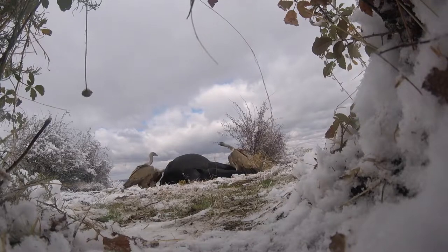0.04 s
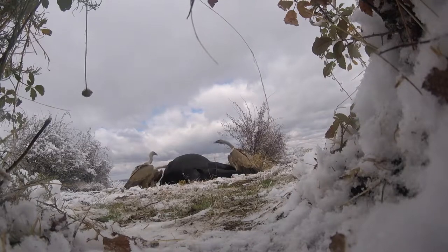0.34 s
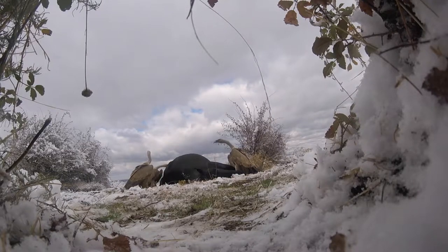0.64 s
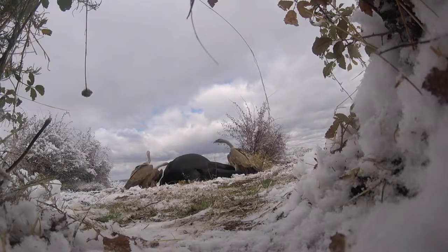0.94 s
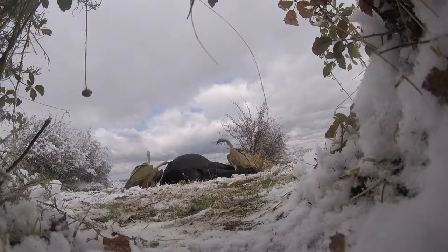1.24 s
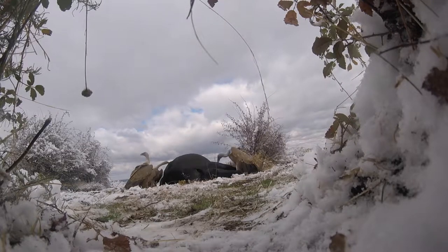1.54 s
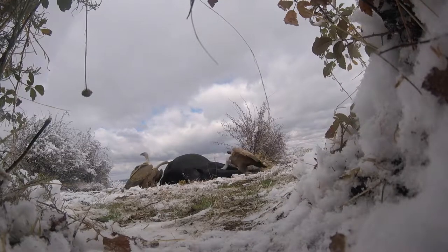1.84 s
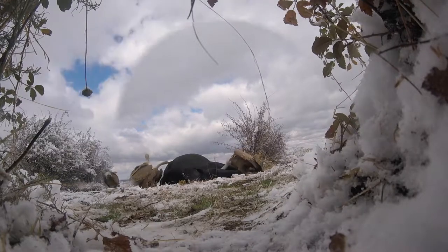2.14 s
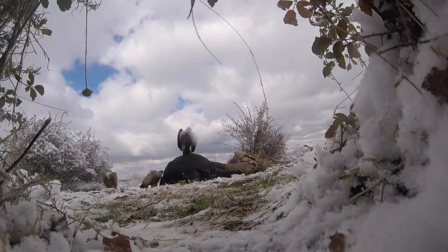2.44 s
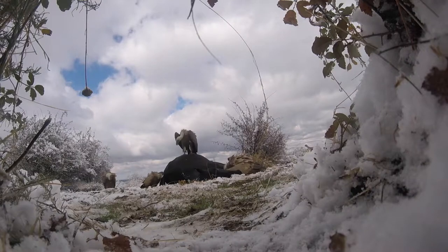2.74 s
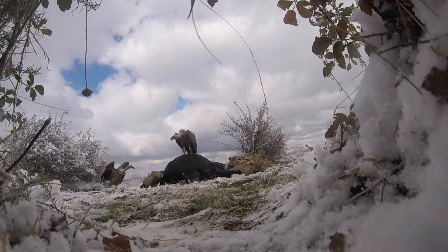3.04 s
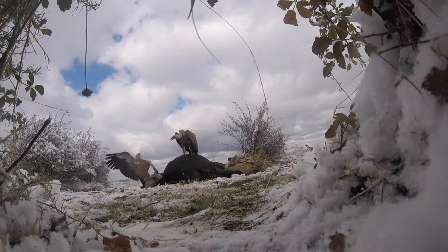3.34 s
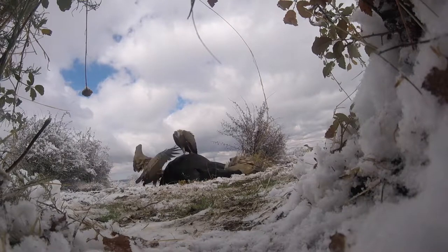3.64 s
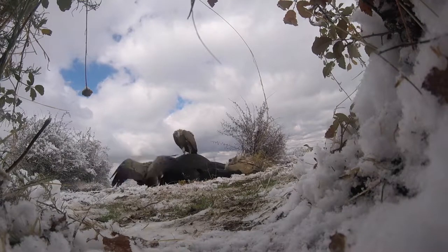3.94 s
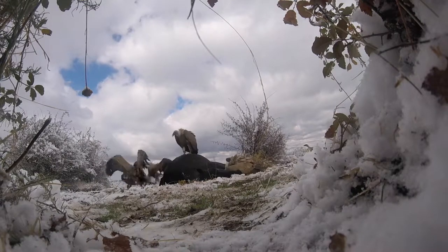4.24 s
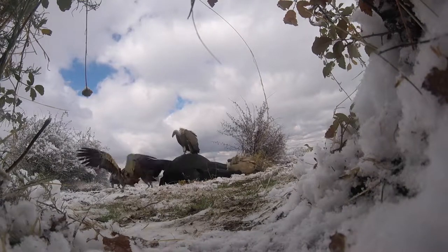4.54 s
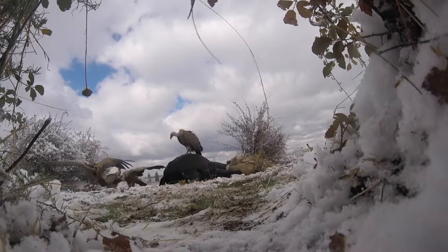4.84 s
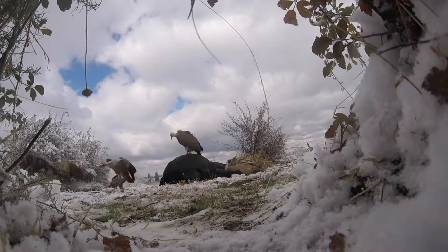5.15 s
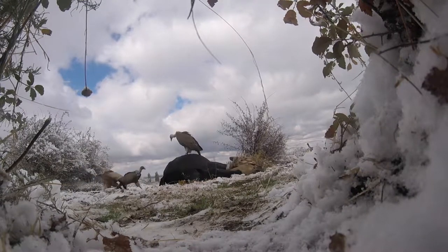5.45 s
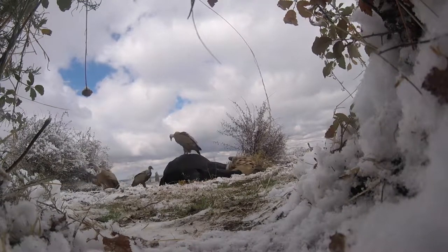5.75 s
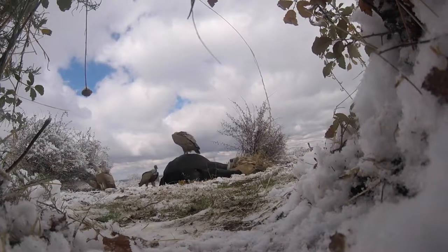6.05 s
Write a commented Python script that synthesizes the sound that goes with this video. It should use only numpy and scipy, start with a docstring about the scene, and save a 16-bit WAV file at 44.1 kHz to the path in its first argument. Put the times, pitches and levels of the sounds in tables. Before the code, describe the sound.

A vulture gives a soft warning hiss, then a long, harsh one with a brief squeal and a rough growl. A scuffle follows, with wingbeats, dull thumps, snapping frozen stalks and a few quick grunts. A rival answers with a squeal and another rasping hiss. The birds are some metres from the microphone, outdoors in snow, over a faint low drone and a barely audible crow.

```python
"""Vultures squabbling in the snow

Vultures fight over a carcass, some metres from a hidden camera. They hiss in long, rasping blasts by
forcing air through a shifting throat, and they squeal and growl. In a scuffle they grunt, beat their
wings and thump the ground. A crow caws far away, over a low drone and the microphone's own hiss."""
import sys
import numpy as np
from scipy import signal
from scipy.fft import rfft, irfft, next_fast_len
from scipy.io import wavfile
from scipy.ndimage import map_coordinates

SR = 44100
rng = np.random.default_rng(int(sys.argv[2]) if len(sys.argv) > 2 else 0)


def int16_out(signal):
    """Quantize to a 16-bit WAV file."""
    q = np.round(np.clip(np.atleast_2d(signal).T, -1, 1) * 32767)
    wavfile.write(sys.argv[1], SR, q.astype(np.int16))


N = 273861
GROWL_START_S, GROWL_END_S = 2.43, 3.04


def amp(db):
    """Turn decibels (dB) into a factor to multiply a sound by."""
    return 10 ** (np.asarray(db) / 20)


def unit(x):
    """Scale a sound to an average power of 1."""
    return x / np.sqrt(np.mean(x ** 2) + 1e-20)


def along(points, hz):
    """Join (frequency, value) points on a musical pitch scale and read the value at hz."""
    point_hz, values = np.transpose(points)
    return np.interp(np.log(hz + 1), np.log(point_hz + 1), values)


def curves(rows, t):
    """Turn rows that start with a time into one curve for each other column, read at times t."""
    times, *columns = np.transpose(rows)
    return [np.interp(t, times, column) for column in columns]


def gate(start, end, fade):
    """A volume curve: 1 from start to end, fading to 0 on both sides (all in seconds)."""
    t = np.arange(N) / SR
    return np.clip(np.minimum(t - start, end - t) / fade + 1, 0, 1)


def swell(peak, rise, fall):
    """A volume curve that is 20 dB down rise seconds before its peak and fall seconds after."""
    t = np.arange(N) / SR - peak
    return amp(-20 * np.maximum(-t / rise, t / fall))


def wobble(rate):
    """A smooth curve through rate random values a second."""
    knots = rng.standard_normal(int(N * rate / SR) + 4)
    return map_coordinates(knots, [np.arange(N) * rate / SR])


def filtered(x, response):
    """Multiply each frequency in x by response(hz)."""
    size = next_fast_len(N + SR // 2)
    return irfft(rfft(x, size) * response(np.fft.rfftfreq(size, 1 / SR)), size)[:N]


def noise(colour, grain_db=0):
    """Noise with a colour (a level for each frequency); grain_db clumps it into tiny bursts."""
    grains = rng.standard_normal(N) * amp(grain_db * wobble(600))
    return unit(filtered(grains, lambda hz: amp(along(colour, hz))))


def bell(hz, centre, width):
    """A resonance: a peak of height 1 where something rings."""
    return 1 / (1 + (2 * (hz - centre) / width) ** 2)


def add(track, start, sound):
    """Mix a sound into the track at a start time in seconds."""
    part = track[max(round(start * SR), 0):][:len(sound)]
    part += sound[:len(part)]


def background():
    """Outdoor rumble, a wavering low drone with a faint electric whine, and the microphone's hiss."""
    # Each row: frequency in Hz, relative level in dB.
    rumble_colour = [(15, -20), (25, -1.5), (55, -4.5), (95, -2), (125, -9), (240, -16), (480, -22.5),
                     (850, -27), (1100, -27.5), (1800, -32), (2500, -47), (3500, -36.5), (4600, -59),
                     (7000, -78)]
    mic_colour = [(2500, -1.5), (4300, -13), (5200, -8), (6100, -7.5), (6450, 7.5), (7100, 0), (8000, -2),
                  (9400, -5), (10400, -12.5), (11800, -8), (13500, -17), (14300, -26)]
    # The drone, then the whine. Each row: pitch in Hz, relative level in dB.
    tones = [(91.5, -60.5), (726.7, -88), (850.6, -81.5), (974.4, -89)]
    hum, t = np.zeros(N), np.arange(N) / SR
    for hz, db in tones:
        level = amp(db + 3.5 + 2.4 * wobble(11))
        hum += level * np.sin(2 * np.pi * hz * t + 0.69 * wobble(6.4))
    lull = amp(-2.5 * gate(2.07, 2.32, 0.16))  # the level dips briefly
    return lull * (amp(-60) * noise(rumble_colour) + hum + amp(-67.5) * noise(mic_colour))


def crow(length_s=0.125, arch=0.21, top_at=0.35, top_width=0.27, rough=0.017):
    """Far caws: the pitch leaps up and falls back, and the overtones pass one throat resonance."""
    # Each row: start in seconds, top pitch in Hz, level in dB.
    caws = [(0.322, 405, -69.5), (0.844, 437, -68.5), (1.865, 419, -68), (4.57, 399, -71)]
    out, progress = np.zeros(N), np.linspace(0, 1, int(length_s * SR))
    leap = np.exp(-((progress - top_at) / top_width) ** 2)
    for start, top_hz, db in caws:
        pitch = top_hz * (1 - arch + arch * leap + rough * wobble(396)[:len(progress)])
        phase = 2 * np.pi * np.cumsum(pitch) / SR
        voice = sum(bell(k * pitch, centre=1770, width=600) * np.sin(k * phase) for k in range(3, 8))
        add(out, start, amp(db) * unit(voice) * np.sin(np.pi * progress))
    return out


def scuffle(wing_fall_s=0.082):
    """Wings push air in low gusts and feet trample in bouts; both brush the snow."""
    # Each row: peak time and rise in seconds, relative levels of air and snow in dB.
    wing_beats = [(3.46, 0.045, -53, -77), (3.757, .035, -50.5, -57.5), (3.92, 0.055, -59, -72),
                  (3.995, 0.14, -51.5, -67), (4.35, 0.027, -70, -62.5), (4.495, 0.15, -56, -65),
                  (4.975, 0.15, -65.5, -82)]
    # Each row: peak time, rise and fall in seconds, relative levels of feet and snow in dB.
    trampling = [(1.75, 0.37, 1.5, -83, -85), (3.5, 1.65, 1.4, -55, -61), (5.95, 2.5, 3.6, -58.5, -72)]
    # Each row: frequency in Hz, relative level in dB.
    gust_colour = [(40, -11), (170, 0), (400, 1), (800, -8), (1600, -18), (4000, -46)]
    snow_colour = [(1500, -10), (4000, -5), (5200, 5), (6600, 3), (8500, -10), (11000, -20), (14000, -70)]
    step_colour = [(80, -35), (180, -0.5), (320, -11.5), (700, -20), (2000, -57)]
    air, tread, brush = np.zeros((3, N))
    for peak, rise, air_db, snow_db in wing_beats:
        beat = swell(peak, rise, wing_fall_s)
        air += amp(air_db) * beat
        brush += amp(snow_db) * beat
    for peak, rise, fall, tread_db, snow_db in trampling:
        bout = swell(peak, rise, fall)
        tread += amp(tread_db) * bout
        brush += amp(snow_db) * bout
    gusts = amp(-3) * air * noise(gust_colour, grain_db=3.5)
    snow = amp(-1.5 + 1.1 * wobble(60)) * brush * noise(snow_colour, grain_db=1.5)
    steps = amp(-3.5) * tread * noise(step_colour, grain_db=5.5)
    return gusts + snow + steps


def snaps(crack_s=0.02, push_s=0.00067):
    """Frozen stalks snap and quills clash: each is a brief crack with one soft push of air, a knock."""
    # Each row: start in seconds, relative level in dB, extra level for the knock in dB.
    cracks = [(2.152, -50, -2), (3.7601, -39.5, 14.5), (3.7662, -38.5, 5.5), (3.902, -46.5, -14),
              (4.042, -40.5, -16), (4.2415, -52.5, 15.5), (4.312, -47, -17), (4.677, -50, 5),
              (4.9333, -54, -8)]
    # Each row: frequency in Hz, relative level in dB.
    crack_colour = [(1500, -9), (4200, -10.5), (5200, 4.5), (6500, 1), (8500, -11), (11000, -33),
                    (14000, -45)]
    crack_level, knocks = np.zeros((2, N))
    t = np.arange(SR // 10) / SR
    push = (1 - t / push_s) * np.exp(-t / push_s)
    for start, db, knock_db in cracks:
        add(crack_level, start, amp(db - 5 - 60 * t / crack_s))
        add(knocks, start, amp(db + knock_db) * push)
    soft_knocks = filtered(knocks, lambda hz: bell(hz, centre=0, width=7500) ** 2)
    return crack_level * noise(crack_colour) + soft_knocks


def thumps(ring_cycles=10.5, onset_s=0.0035):
    """Bodies and feet land on the ground and the carcass: a short, sinking tone with a dull puff."""
    # Each row: start in seconds, final pitch in Hz, relative level in dB.
    landings = [(1.83, 250, -49), (3.327, 338, -33.5), (3.588, 268, -44), (3.763, 71.6, -44.5),
                (3.874, 80, -52), (4.012, 177, -43), (4.159, 168, -46), (4.488, 172, -38),
                (4.599, 167, -52), (4.93, 182, -54), (5.412, 784, -38), (5.491, 200, -45),
                (5.635, 46.6, -47), (5.808, 36.6, -50)]
    out, t = np.zeros(N), np.arange(SR // 4) / SR
    puff = noise([(60, 13), (300, -5), (700, -8), (2000, -19), (6000, -68)])
    onset = np.exp(-t / onset_s)
    for start, hz, db in landings:
        phase = 2 * np.pi * np.cumsum(hz * (1 + 0.086 * onset)) / SR
        body = np.sin(phase) + 0.39 * puff[round(start * SR):][:len(t)]
        decay = amp(db - 60 * t * hz / ring_cycles)  # deeper thumps last longer
        add(out, start, 1.97 * decay * (1 - onset) * body)
    return out


def grunts(bark_s=0.017, spacing_s=0.021):
    """Pairs of hoarse barks: bursts of noise that start hard and fade."""
    # Each row: start in seconds, relative levels of the first and second bark in dB.
    pairs = [(4.113, -55.5, -59), (4.190, -56.5, -57.5), (4.269, -55, -58.5), (4.339, -52.5, -49.5)]
    # Each row: frequency in Hz, relative level in dB.
    bark_colour = [(150, -44), (250, -12), (349, -23), (409, 2.5), (690, -5), (845, 0), (1160, -3.5),
                   (1510, -8), (1650, -5), (1880, -6.5), (2470, -23), (3500, -12), (4290, -29), (4750, -8),
                   (8000, -31), (10400, -61), (17600, -120)]
    effort, t = np.zeros(N), np.arange(N) / SR
    for pair_start, first_db, second_db in pairs:
        for start, db in ((pair_start, first_db), (pair_start + spacing_s, second_db)):
            progress = np.clip((t - start) / bark_s, 0, 1)
            effort += amp(db + 1 - 5.5 * progress) * gate(start, start + bark_s, 0.0046)
    return effort * noise(bark_colour)


def growl(pitch_hz=369, scoop=0.16, scoop_s=0.08, waver=0.032, rough=0.05, db=-56):
    """The attacker's rough, low voice swells as it slides up to pitch; the chest boosts its octave."""
    elapsed = np.maximum(np.arange(N) / SR - GROWL_START_S, 0)
    slack = np.exp(-elapsed / scoop_s)
    pitch = pitch_hz * (1 - scoop * slack + waver * wobble(15) + rough * wobble(300))
    phase = 2 * np.pi * np.cumsum(pitch) / SR
    voice = np.sin(2 * phase) + amp(-11) * np.sin(phase)
    level = amp(db - 9.8 * slack + 2.2 * wobble(77))
    return level * unit(voice) * gate(GROWL_START_S, GROWL_END_S, 0.02)


def squeals(rough=0.021):
    """As a hard hiss begins, the stream of air locks into a hoarse, gliding whistle."""
    # Each row: start and length in seconds, first and last pitch in Hz, level in dB,
    # level of the octave in dB compared with the main tone.
    whistles = [(2.264, .06, 1760, 1830, -60.5, -25), (2.377, .15, 1902, 1980, -44.5, -24),
                (5.268, .045, 2100, 1890, -62, -6), (5.305, .13, 1641, 1600, -54, -21)]
    out = np.zeros(N)
    for start, length, first_hz, last_hz, db, octave_db in whistles:
        progress = np.linspace(0, 1, int(length * SR))
        glide = first_hz + (last_hz - first_hz) * progress ** 2
        pitch = glide * (1 + rough * wobble(1100)[:len(progress)])
        phase = 2 * np.pi * np.cumsum(pitch) / SR
        envelope = np.sqrt(np.abs(np.sin(np.pi * np.sqrt(progress))))
        add(out, start, amp(db) * envelope * (np.sin(phase) + amp(octave_db) * np.sin(2 * phase)))
    return out


def hiss(force, posture, colour, low_band_db, ring_db, chest_db, mouth_db, beak_db, flutter_db):
    """Rushing air rings the chest, windpipe, throat, mouth and beak; force sets level and brightness."""
    # How the ground reflects sound. Each row: frequency in Hz, factor on the echo's strength.
    snow_echo = [(700, 0.2), (1800, 1.4), (4200, 0.7), (7000, 3.3)]
    slices = dict(fs=SR, nperseg=1024, noverlap=768)  # short slices of noise, each shaped on its own
    hz, t, air = signal.stft(rng.standard_normal(N), **slices)
    hz = hz[:, None]
    pipe_hz, throat_hz, lean_db, echo_ms, echo = curves(posture, t)
    airway = amp(along(colour, hz)
                 + chest_db * bell(hz, 920, 150)
                 + (ring_db - lean_db) * bell(hz, pipe_hz, 118)
                 + (ring_db + lean_db) * bell(hz, throat_hz, 104)
                 + mouth_db * bell(hz, 2.03 * pipe_hz, 1000)
                 + beak_db * bell(hz, 3.15 * pipe_hz, 600))
    # The ground echo cancels some frequencies; these notches sweep as the head moves.
    bounce = np.clip(echo * along(snow_echo, hz), 0, 0.9)
    notches = np.abs(1 + bounce * np.exp(-2j * np.pi * hz * echo_ms / 1000))
    chest_band = 1 / (1 + (hz / 1000) ** 12)  # below 1000 Hz
    beak_band = 1 / (1 + (2700 / (hz + 1)) ** 12)  # above 2700 Hz
    throat_band = np.abs(1 - chest_band - beak_band)
    mid_db, high_db = curves(force, np.arange(N) / SR)
    out = np.zeros(N)
    for band, db in ((throat_band, mid_db), (beak_band, high_db), (chest_band, mid_db + low_band_db)):
        gain = airway * notches * band
        gain /= np.sqrt(np.mean(gain ** 2, axis=0))  # keep the power even as the posture changes
        out += amp(db) * signal.istft(air * gain, **slices)[1][:N]
    start, end = force[0][0], force[-1][0]
    return out * amp(flutter_db * wobble(45)) * gate(start, end, 0.039)


def hisses():
    """Three blasts of breath: a soft warning, the long attack and a rival's reply."""
    # How hard the bird blows, one list for each hiss.
    # Each row: time in seconds, relative levels of the throat band and the beak band in dB.
    forces = [
        [(1.16, -72, -83), (1.176, -70, -83), (1.258, -69, -79), (1.338, -63, -72), (1.628, -65.5, -62.5),
         (1.668, -75, -68), (1.732, -72, -76), (1.74, -76, -68), (1.81, -71, -68.5), (1.85, -70, -74)],
        [(2.25, -72, -82), (2.286, -55, -71.5), (2.38, -51, -68), (2.402, -46.5, -61), (2.542, -45.5, -50),
         (2.706, -41, -44), (3.062, -42, -41.5), (3.18, -42.5, -46), (3.664, -45.5, -47.5), (3.73, -60.5, -68)],
        [(5.29, -68.5, -75), (5.312, -57.5, -72.5), (5.466, -46, -46), (5.57, -45, -43.5), (5.652, -43, -42),
         (5.666, -46.5, -42), (5.79, -41, -44), (6.016, -47, -51), (6.064, -46, -46), (6.2, -50.5, -48)],
    ]
    # Each row: time in seconds, windpipe and throat resonances in Hz, lean from windpipe towards
    # throat in dB, ground echo delay in milliseconds, relative echo strength.
    warning_posture = [(1.2, 1530, 1980, 3, 1.5, .2), (1.42, 1630, 2150, 9, 1.14, 0.4),
                       (1.62, 1600, 2200, -3, 0.98, 0.04)]
    attack_posture = [(2.27, 1570, 1750, -1, 1.12, 0.29), (2.41, 1630, 1950, 2, 1.07, 0.34),
                      (2.52, 1590, 1880, -5.5, 0.95, 0.72), (2.6, 1690, 2250, -2, 0.8, .4),
                      (2.68, 1680, 2320, -1.5, 0.722, 0.36), (2.78, 1685, 2040, -6, 0.8, 0.28),
                      (2.92, 1670, 2030, 3.5, 0.928, .38), (3.04, 1664, 2000, -1, 1.176, 0.28),
                      (3.5, 1652, 1960, -6, 1.1, 0.25), (3.62, 1590, 1820, -4.5, 1.45, .35)]
    reply_posture = [(5.38, 1620, 1900, -5, 0.58, 0.19), (5.78, 1653, 2000, -2, 0.49, 0.077),
                     (5.899, 1724, 1940, -4, 0.36, .15), (5.99, 1670, 2000, -1.5, 0.29, 0.52),
                     (6.1, 1666, 2090, -4.5, 0.24, 0.16), (6.2, 1670, 2120, -2, .14, 0.09)]
    # Each row: frequency in Hz, relative level in dB.
    full_colour = [(200, -10), (420, -3.5), (560, -4.5), (700, 2), (900, 1), (1050, -0.5), (1260, 6),
                   (1430, -3), (2350, -1.5), (2850, -5.5), (4600, 3), (5700, 4), (6900, -5), (7900, -19.5),
                   (9800, -29.5), (14000, -69)]
    thin_colour = [(300, -47), (680, -20.5), (860, -8.5), (1060, -10), (1280, 3.5), (1800, 0.5), (2380, 1),
                   (2750, -6.5), (4400, -7.5), (5000, -6), (5900, -4.5), (7000, -14), (7900, -29),
                   (9800, -39), (14000, -72)]
    growl_db = 5 * gate(GROWL_START_S, GROWL_END_S, 0.013)  # the chest rings more during the growl
    warning = hiss(forces[0], warning_posture, thin_colour, low_band_db=-12,
                   ring_db=5, chest_db=-1, mouth_db=6.5, beak_db=4, flutter_db=1.5)
    attack = hiss(forces[1], attack_posture, full_colour, low_band_db=growl_db - 16,
                  ring_db=12.5, chest_db=-2, mouth_db=10.5, beak_db=8.5, flutter_db=0.64)
    reply = hiss(forces[2], reply_posture, thin_colour, low_band_db=-21.5,
                 ring_db=12, chest_db=1.5, mouth_db=7, beak_db=8.5, flutter_db=0.66)
    return amp(-0.5) * warning + amp(-0.23) * attack + amp(-0.12) * reply


def scene():
    """Add all the sounds into one channel."""
    vultures = hisses() + growl() + squeals() + grunts() + thumps() + snaps() + scuffle()
    return (vultures + crow() + background())[None]


def record(dry, top_hz=14200):
    """The camera keeps no sound above its top frequency."""
    return filtered(dry[0], lambda hz: hz < top_hz)[None]


dry = scene()
out = record(dry)
int16_out(out)
```